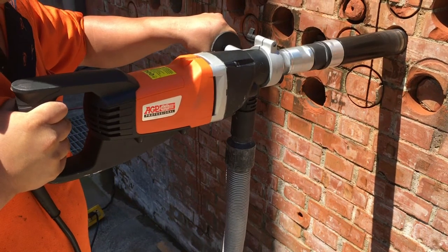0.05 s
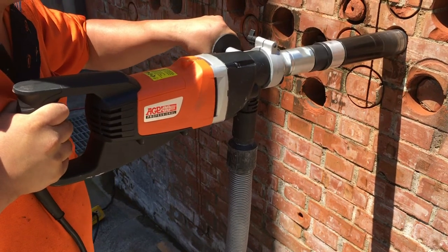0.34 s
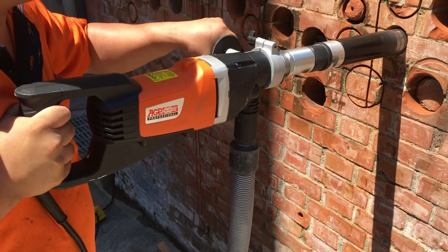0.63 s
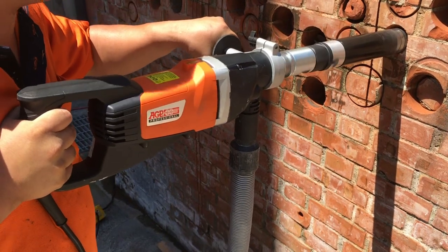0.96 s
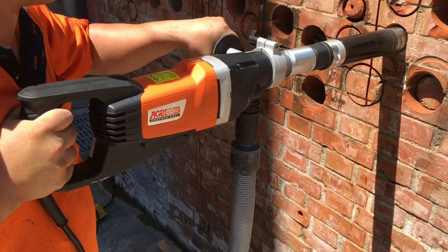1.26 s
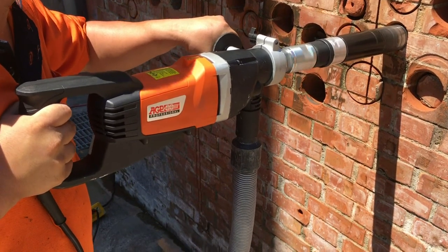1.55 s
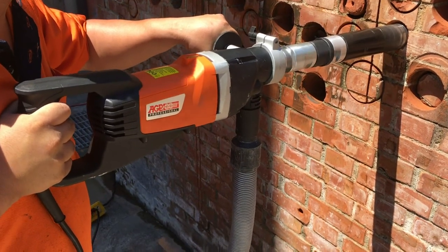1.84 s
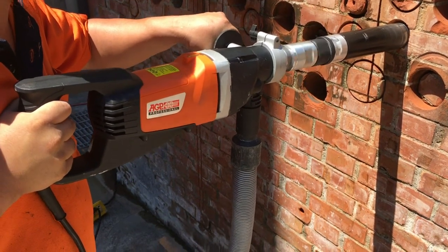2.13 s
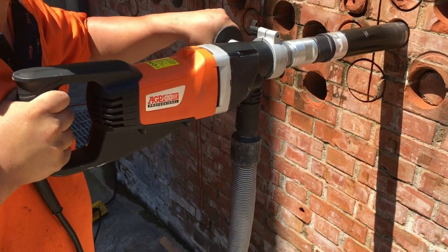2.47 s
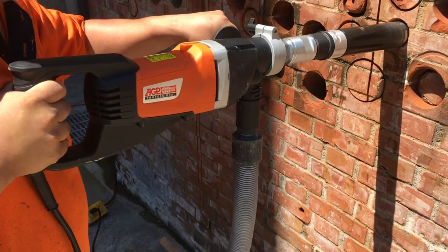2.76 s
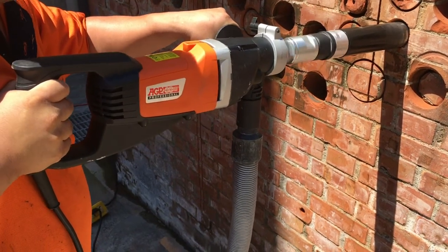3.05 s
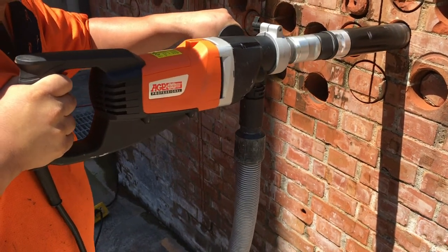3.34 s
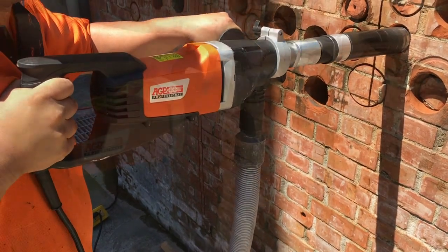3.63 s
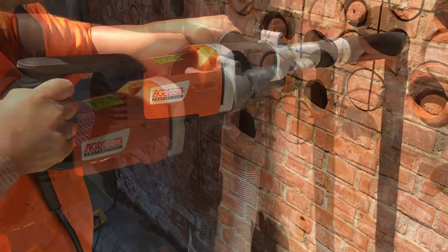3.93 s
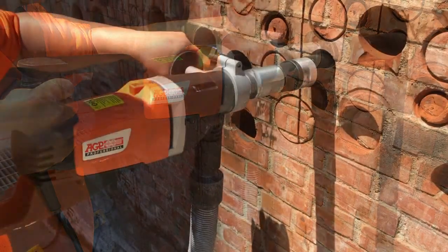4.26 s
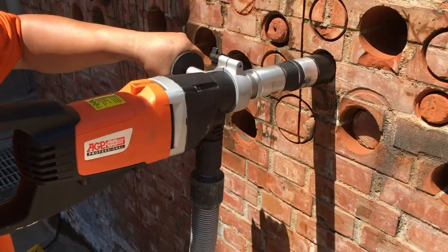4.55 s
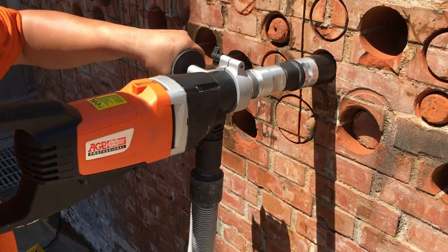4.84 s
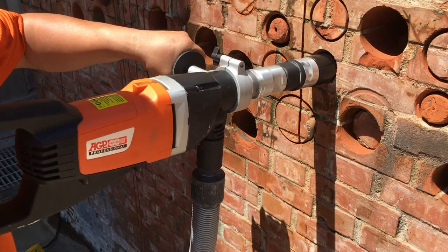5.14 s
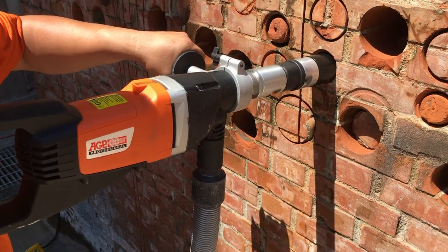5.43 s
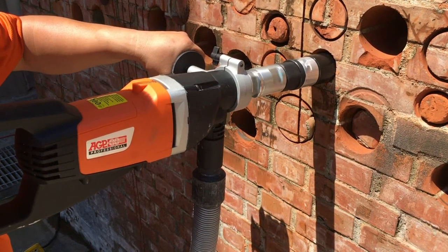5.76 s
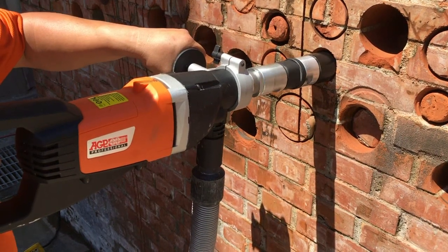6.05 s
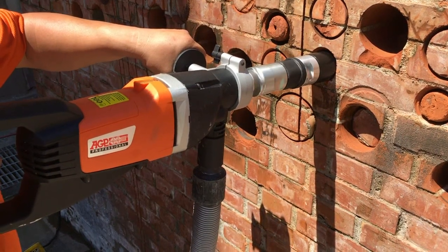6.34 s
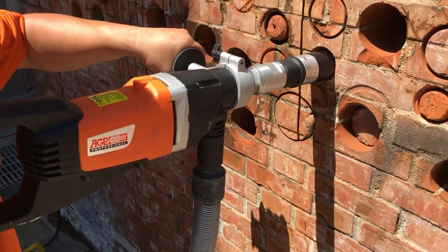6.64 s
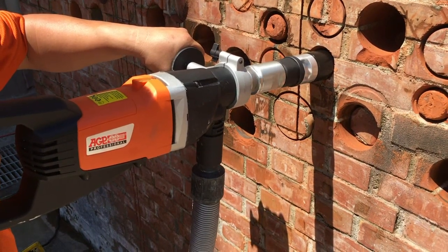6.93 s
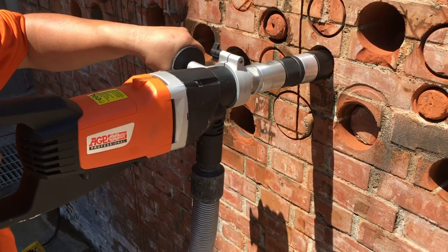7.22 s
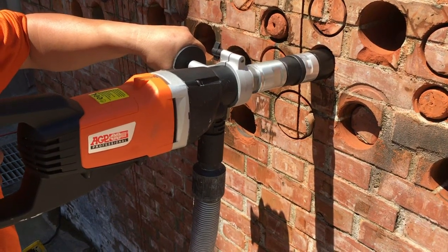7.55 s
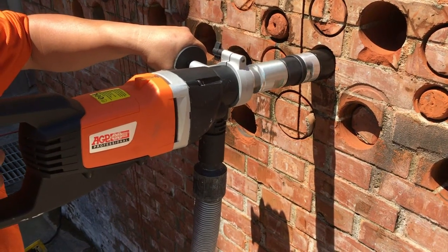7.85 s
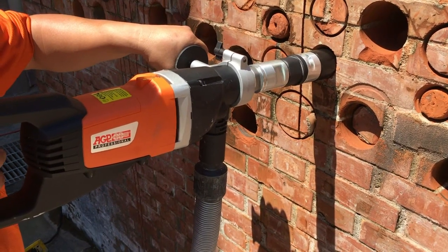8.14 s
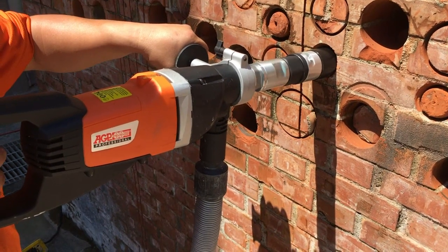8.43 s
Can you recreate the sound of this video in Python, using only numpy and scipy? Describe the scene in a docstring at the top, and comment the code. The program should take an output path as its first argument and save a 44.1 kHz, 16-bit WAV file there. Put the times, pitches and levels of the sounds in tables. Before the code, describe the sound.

A handheld electric core drill is already cutting dry into brick, heard close up outdoors. Its gears whine over the steady rush, hiss and thin whistle of a dust extractor. From the start, the crown bites in short, irregular bursts, a few each second, each bringing gritty grinding, fine crackle and a high ring from the steel tube. The whine sags under each bite and recovers, and hard bites add a shuddering growl. At about 3.6 seconds everything fades, almost vanishing at 4.1 seconds, then returns by 4.5 seconds. This second stretch is slightly lower in pitch, with fuller grinding and less whistle, and the uneven biting continues. From about 7.5 seconds the bites become lighter and sparser, and the whine rises a little and grows clearer. Drill and extractor are still running at the end, around 8.6 seconds.

```python
"""Core drilling a brick wall

Outdoors, one microphone close to a handheld electric core drill cutting dry, a dust extractor drawing
air through it. The gears whine and sag under load; whenever the crown bites, grit makes the steel tube
ring, and hard bites set it shuddering. One stretch of drilling fades out and a second, deeper in the
wall, fades in and eases off. Mono."""
import sys
import numpy as np
from scipy import signal
from scipy.fft import rfft, irfft, next_fast_len
from scipy.io import wavfile
from scipy.ndimage import uniform_filter1d

SR = 44100
rng = np.random.default_rng(int(sys.argv[2]) if len(sys.argv) > 2 else 0)


def dump(signal):
    """Clip the signal to [-1, 1] and save it as 16-bit WAV at the path in sys.argv[1]."""
    limited = np.clip(np.atleast_2d(signal).T, -1, 1)
    pcm = np.round(limited * 32767).astype(np.int16)
    wavfile.write(sys.argv[1], SR, pcm)


N = 378819
TIME = np.arange(N) / SR
SECOND_STRETCH_S = 4.112

# The crown bites into the brick. Each row: start in seconds, length in seconds, ring in dB,
# growl in dB, braking of the rotor in turns per second.
CROWN_BITES = [(0.02, 0.063, -16.5, -40, 7), (0.49, 0.08, -16, -40.5, 5.5), (0.572, 0.067, -16, -41, 7.0),
               (0.652, 0.12, -18, -47, 5.5), (0.841, 0.17, -16, -40, 12), (1.113, 0.071, -19.5, -39.0, 14),
               (1.287, 0.069, -22, -68, 5), (1.38, 0.1, -19, -61, 7.5), (1.527, 0.17, -16, -37.0, 14.0),
               (1.811, 0.18, -17.5, -38.5, 12), (2.069, 0.14, -16.5, -38.5, 16.5),
               (2.31, 0.048, -18, -49, 8), (2.371, 0.1, -16.5, -42.5, 15), (2.53, 0.085, -19, -49, 9.5),
               (2.7, 0.048, -17, -43.0, 9.5), (2.8, 0.16, -17.5, -39.0, 7.5), (2.989, 0.22, -17, -39.5, 4),
               (3.43, 0.21, -16.5, -41, 12.5), (3.738, 0.075, -18.5, -39.0, 13.5),
               (4.376, 0.25, -18, -42.5, 10.5), (4.681, 0.11, -16.5, -42.5, 12),
               (5.047, 0.19, -16.5, -40.5, 5.5), (5.289, 0.29, -16, -39.5, 6.5),
               (5.611, 0.054, -20.5, -48, 0.0), (5.721, 0.14, -17, -44, 11), (5.91, 0.083, -15.5, -44, 17),
               (6.045, 0.06, -17, -41, 9.5), (6.251, 0.083, -15.0, -42.5, 7),
               (6.484, 0.13, -16, -40.5, 9.5), (6.763, 0.082, -17.0, -39.5, 6),
               (6.869, 0.11, -15.0, -40, 12), (7.08, 0.13, -16, -39, 14.5), (7.349, 0.064, -17, -41.5, 7),
               (7.5, 0.097, -21.5, -50, 0.34), (7.752, 0.03, -20.5, -56, 5.5), (7.97, 0.031, -21.5, -60, 8),
               (8.338, 0.052, -22.5, -60.5, 3.5), (8.426, 0.041, -19.5, -51, 1.3)]
# Resonances of gearbox and tube. Each row: frequency in Hz, width in Hz, gain in dB.
BODY_MODES = [(817, 45, -1), (927, 64, 1.5), (1138, 226, 3.5), (1217, 152, 4), (1418, 86, 2.5),
              (1564, 238, 0.5), (1677, 155, 4), (2011.5, 125, 5), (2015, 99, 4.5), (2400, 325, -5.5),
              (2770, 92, -2.5), (2930, 69, -6.5), (3280, 490, -11), (4360, 1600, -18.5), (5190, 380, -12),
              (6320, 310, -14.5)]


def from_db(db):
    return 10 ** (np.asarray(db) / 20)


def rms_one(x):
    return x / np.sqrt(np.mean(x ** 2) + 1e-20)


def in_time(rows):
    """A curve through rows of seconds and value, sample by sample."""
    return np.interp(TIME, *np.transpose(rows))


def drift(rate):
    """Smooth random wander of spread 1, mostly slower than rate in Hz."""
    pole = np.exp(-40 * np.pi * rate / SR)   # runs at a twentieth of the sample rate
    slow = signal.lfilter([1], [1, -2 * pole, pole * pole], rng.standard_normal(N // 20 + 4002))[4000:]
    return np.interp(np.arange(N) / 20, np.arange(len(slow)), rms_one(slow))


def butter(x, order, hz, kind):
    return signal.sosfilt(signal.butter(order, hz, kind, fs=SR, output="sos"), x)


def resonate(x, hz, width_hz):
    """A two-pole resonance with gain 1 at its peak."""
    r = np.exp(-np.pi * width_hz / SR)
    feedback = [1, -2 * r * np.cos(2 * np.pi * hz / SR), r * r]
    return signal.lfilter(np.array([1, 0, -1]) * (1 - r * r) / 2, feedback, x + 1e-18)


def coloured(spectrum):
    """Noise of rms 1, shaped by rows of Hz and dB."""
    size = next_fast_len(N)
    hz, level_db = np.transpose(spectrum)
    gain = from_db(np.interp(np.log(np.fft.rfftfreq(size, 1 / SR) + 1), np.log(hz), level_db))
    return rms_one(irfft(rfft(rng.standard_normal(size)) * gain, size)[:N])


def grit(per_s, spread_db):
    """Random clicks of uneven size, rms 1."""
    sizes = from_db(spread_db * np.clip(rng.standard_normal(N), -2, 2)) * rng.choice([-1, 1], N)
    return rms_one(sizes * (rng.random(N) < per_s / SR))


def tone(phase, rough, rate):
    """A sine of rms 1; rough sets the depth of its random flutter, rate the speed in Hz."""
    flutter = (drift(rate) + 1j * drift(rate)) / np.sqrt(2)
    start = 2 * np.pi * rng.random()
    return np.sqrt(2 / (1 + rough ** 2)) * np.real((1 + rough * flutter) * np.exp(1j * (phase + start)))


def episodes(rows, between_db, edge_s):
    """A gain that ramps to each episode's level and back."""
    level = np.full(N, from_db(between_db))
    for start, length, level_db in rows:
        level[int(start * SR):int((start + length) * SR)] = from_db(level_db)
    return uniform_filter1d(level, max(int(edge_s * SR), 1))


def motor_speed():
    """Rotor turns per second: bites brake the rotor, which sags and recovers with its inertia."""
    # Speed under feed pressure alone. Each row: time in seconds, turns per second.
    feed_speed = [(0, 187.1), (0.42, 190.7), (0.7, 184.1), (1.05, 180.9), (1.7, 182.0), (2.3, 184.3),
                  (3.2, 182.3), (3.38, 187.1), (3.7, 188.9), (4.11, 190.8), (4.115, 172.4), (4.75, 179.8),
                  (5.03, 182.2), (5.6, 174.3), (6.05, 180.7), (6.45, 181.3), (6.8, 175.9), (7.22, 179.8),
                  (7.65, 182.3), (8.59, 187.1)]
    inertia_s = .15
    braking = np.zeros(N)
    for start, length, _, _, turns in CROWN_BITES:
        braking += turns * ((TIME >= start) & (TIME < start + length))
    pole = np.exp(-1 / (inertia_s * SR))
    return in_time(feed_speed) - signal.lfilter([1 - pole], [1, -pole], braking)


def gearbox(force, modes):
    """Gearbox and tube answer a force with parallel resonances of alternating sign."""
    return sum((-1) ** k * from_db(db) * resonate(force, hz, width)
               for k, (hz, width, db) in enumerate(modes))


def gears(angle, turns, shake, second):
    """Tooth tones ride on the rotor angle; the big wheel's runout sways them, shudders break them up."""
    # Main whine. Each row: time in seconds, level in dB before shudders duck it.
    whine_levels = [(0, -20), (.45, -18), (1.0, -20.5), (1.4, -19.5), (1.8, -21.5), (2.8, -20.5),
                    (3.4, -20.5), (4.05, -22.5), (4.15, -23.5), (6.05, -22.5), (6.7, -18), (7.5, -21),
                    (8.25, -17.5), (8.59, -17)]
    # Other tooth tones. Each row: multiple of rotor rate, then dB relative to the whine for a
    # labouring and an eased motor in the first stretch, and the same pair in the second.
    tooth_tones = [(3, -11.5, -15.5, -16, -14), (9, -5, -7, -13, -7.5), (12, -20.5, -15.5, -11.5, -21),
                   (15, -13.5, -17, -18, -10)]
    # Tones driven by torque. Each row: multiple of rotor rate, relative dB in first and second stretch.
    loaded_tones = [(5, -34, -44), (7, -37.5, -53), (8, -32, -32.5), (10, -40.5, -36), (11, -28, -32),
                    (13, -37, -55), (14, -37.5, -32.5), (17, -26, -35)]
    # Thin whines of the lightly loaded drive. Each row: multiple of rotor rate, relative level in dB.
    free_tones = [(5.05, -40), (5.4, -36), (6.4, -46), (8.05, -35), (18, -41), (21, -42), (27.2, -38.5),
                  (30.05, -49), (33.1, -39.5), (41.65, -46.5)]
    mesh_order, wheel_order = 6, .207   # multiples of rotor rate
    free_turns, loaded_turns, labouring_turns, eased_turns = 190, 176, 177, 181.2   # per second
    torque = np.clip((free_turns - turns) / (free_turns - loaded_turns), 0, 1)
    ease = np.clip((turns - labouring_turns) / (eased_turns - labouring_turns), 0, 1)
    wheel = wheel_order * angle
    angle = angle + 0.03 * np.sin(wheel) + 0.0027 * np.sin(2 * wheel) + 0.07 * shake * drift(30)
    whine_db = in_time(whine_levels)
    out = from_db(whine_db - 3.5 * shake) * tone(mesh_order * angle, rough=0.039 + 0.29 * shake, rate=82.8)
    meshing = 1.016 / (1 + 1.25 * shake ** 2)   # teeth that rattle loose lose their overtones
    flutter = .015 + .04 * shake
    for order, first_hard_db, first_eased_db, second_hard_db, second_eased_db in tooth_tones:
        hard_db = np.where(second, second_hard_db, first_hard_db)
        eased_db = np.where(second, second_eased_db, first_eased_db)
        gain = from_db(whine_db + (1 - ease) * hard_db + ease * eased_db)
        gain *= meshing if order > mesh_order else 1
        out += gain * tone(order * angle, rough=flutter * order, rate=16)
    # loaded tones sing out as the speed carries them across a resonance
    drive = sum(from_db(np.where(second, second_db, first_db)) * tone(order * angle, rough=1, rate=9.4)
                for order, first_db, second_db in loaded_tones)
    out += gearbox(drive * (0.68 + 0.4 * torque), BODY_MODES)
    free_gain = meshing * (1.1 - 0.51 * torque) * from_db(np.where(second, 1, -6))
    for order, level_db in free_tones:
        out += from_db(level_db) * free_gain * tone(order * angle, rough=0.3, rate=11)
    return out


def grinding(load, shake, snag_db, judder, second):
    """Crushed grains drive gearbox and tube, harder with every bite, shudder and snag."""
    follows_load = np.where(second, 0.51, 0.79)
    effort_db = follows_load * 20 * np.log10(load) + 1.5 * shake
    force = grit(per_s=12000, spread_db=2.5) * from_db(1.3 * judder)
    low, high = gearbox(force, BODY_MODES[:4]), gearbox(force, BODY_MODES[4:])
    # harder grinding and a deeper hole bring out the lower resonances
    low_gain = from_db(0.54 * effort_db + np.where(second, -5.4, -7.4))
    body = low_gain * rms_one(low) + from_db(-3.5) * rms_one(high)
    return from_db(-20 + effort_db + snag_db) * butter(body, 5, 670, "high")


def crown_ring(bite, judder, second):
    """The segments catch in short bursts of grit that set the steel ringing; coarser grains crack."""
    # Each row: frequency in Hz, width in Hz, relative dB in first and second stretch.
    steel_modes = [(9050, 480, -14.5, -12.5), (9658, 276, -2, -2), (9913, 121, 0, 4),
                   (10150, 120, -1, -3.5), (12420, 560, -13, -10)]
    bursts = from_db(1.25 * judder + 2.5 * drift(380) + 1.13 * drift(18))
    force = rms_one(grit(per_s=6000, spread_db=2.3) * bursts)
    ring = sum((-1) ** k * from_db(np.where(second, second_db, first_db)) * resonate(force, hz, width)
               for k, (hz, width, first_db, second_db) in enumerate(steel_modes))
    cracks = grit(per_s=280, spread_db=3) * from_db(1.4 * judder)
    crackle = butter(cracks, 2, [2200, 7000], "band")
    return bite * (rms_one(ring) + from_db(-17) * rms_one(crackle))


def chatter(angle, shudder, load, second):
    """A shuddering tube growls; bites knock dully through the drill."""
    # Low resonances of the drill on its handles. Each row: frequency in Hz, half the width of each
    # filter pass in Hz, dB at a firm bite in first and second stretch.
    handle_modes = [(100, 56, -64, -50), (164, 91, -48, -48.5), (234, 67, -54.5, -50.5),
                    (364, 47, -45, -46.5), (744, 120, -39, -35.5)]
    thuds = grit(per_s=900, spread_db=6)
    knock = np.zeros(N)
    for hz, half_width, first_db, second_db in handle_modes:
        mode = resonate(resonate(thuds, hz, 2 * half_width), hz, 2 * half_width)
        knock += from_db(np.where(second, second_db, first_db)) * rms_one(mode)
    growl = shudder * tone(1.5 * angle, rough=0.88, rate=29)
    return growl + load ** 1.7 * knock


def idle_hum(hz):
    """A low hum that all but stops once the crown is pressed in."""
    # Each row: time in seconds, level in dB.
    hum_levels = [(0, -46), (.48, -51), (.56, -67), (8.59, -59.5)]
    return from_db(in_time(hum_levels)) * tone(2 * np.pi * hz * TIME, rough=0.24, rate=6.5)


def airflow():
    """Steady rush of cooling fan and extractor, and the hiss of dusty air drawn into the hole."""
    # Spectra of rush and hiss. Each row: frequency in Hz, relative density in dB.
    rush_spectrum = [(20, -44), (45, -23), (62, 7), (85, -7.5), (140, -2.5), (180, -0.5), (380, 2),
                     (650, 10), (950, -16), (2500, 11.5), (3900, 2.5), (6000, 4), (7500, 0.5), (16000, 4.5)]
    hiss_spectrum = [(1500, -12), (3500, -2), (5500, 1), (7500, -5.5), (9000, 2), (11500, 1), (13500, 1),
                     (16000, -0.5)]
    # Suction at the hole. Each row: time in seconds, mean hiss level in dB.
    suction = [(0, -23.5), (.5, -20.5), (1.05, -24), (2.9, -23.5), (4.0, -30), (4.15, -38.5), (5.05, -24),
               (7.25, -33.5), (7.9, -24.5), (8.59, -23.5)]
    rush = from_db(-26.5) * butter(coloured(rush_spectrum), 6, 38, "high")
    hiss = from_db(in_time(suction) + 1.3 * drift(91)) * coloured(hiss_spectrum)
    return rush + hiss


def extractor_whistles(second):
    """Extractor and hose hum and whistle: breathy tones that ignore the drill's speed."""
    # Each row: frequency in Hz, width of its wander in Hz, dB in first and second stretch.
    whistles = [(62.6, 11.52, -75, -62), (138.6, 8.264, -57, -60.5), (377.5, 13.52, -52.5, -52.5),
                (2493, 70, -31.5, -55), (3420, 42.3, -43, -40.5), (4590, 76, -44, -55),
                (5230, 99, -39.5, -48), (5575, 100, -37.5, -47)]
    out = np.zeros(N)
    for hz, width, first_db, second_db in whistles:
        phase = 2 * np.pi * hz * TIME + np.cumsum(drift(30)) * np.pi * width / SR
        out += from_db(np.where(second, second_db, first_db)) * tone(phase, rough=0.35, rate=11.6)
    return out


def snags():
    """Extra grinding in dB: a segment snags on a hard grain, flaring at once and dying away."""
    # Each row: start in seconds, decay in seconds, added level in dB.
    hard_grains = [(2.9, 0.01, 8), (3.022, 0.0061, 7), (5.05, 0.011, 7), (5.721, 0.0085, 3.5),
                   (5.985, 0.0096, 2), (6.284, 0.0082, 4), (6.492, 0.013, 9), (8.39, 0.072, 6)]
    return sum(db * (TIME >= start) * np.exp(-np.abs(TIME - start) / decay)
               for start, decay, db in hard_grains)


def scene():
    """Drill and extractor at the wall, close to one microphone."""
    second = TIME > SECOND_STRETCH_S
    start, length, ring_db, growl_db, _ = np.transpose(CROWN_BITES)
    # between bites the crown only skims the brick
    bite = episodes(zip(start, length, ring_db), between_db=-24.5, edge_s=0.0091)
    shudder = episodes(zip(start, length, growl_db), between_db=-57, edge_s=0.015)
    load, shake = bite / from_db(-17), shudder / from_db(-36)   # 1 at a firm bite, a full shudder
    turns = motor_speed() + 0.507 * load ** 2 * drift(14.1)   # uneven cutting makes the speed waver
    angle = 2 * np.pi * np.cumsum(turns) / SR
    judder = drift(59)   # uneven contact, shared by grinding and ring
    snag_db = snags()
    drill = gears(angle, turns, shake + 0.02 * snag_db, second)   # snags jolt the gears too
    drill += grinding(load, shake, snag_db, judder, second)
    drill += crown_ring(bite, judder, second) + chatter(angle, shudder, load, second)
    return np.tile(drill + idle_hum(hz=140.3) + airflow() + extractor_whistles(second), (2, 1))


def record(dry):
    """A fade out and in between the stretches, softly limited peaks and a steep top cut."""
    # Each row: time in seconds, gain as a factor.
    fader = [(0, 1), (3.62, 1), (4.04, .13), (4.09, .006), (4.112, .002), (4.113, .11), (4.45, 1), (8.6, 1)]
    ceiling, cutoff_hz = .85, 15700
    faded = dry * in_time(fader)
    limited = faded / (1 + (faded / ceiling) ** 8) ** (1 / 8)
    return signal.sosfilt(signal.ellip(14, .1, 100, cutoff_hz, fs=SR, output="sos"), limited)


dry = scene()
out = record(dry)
dump(out)
```